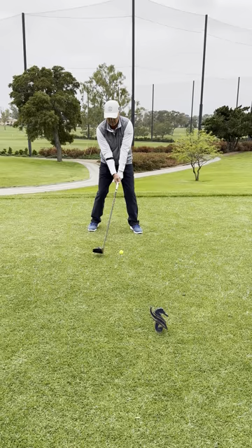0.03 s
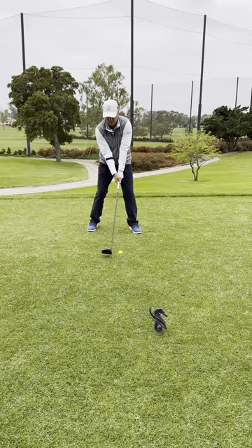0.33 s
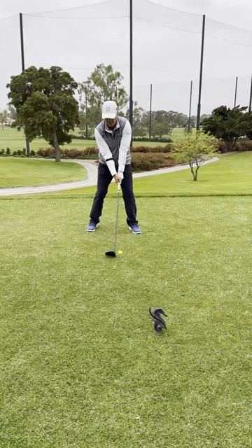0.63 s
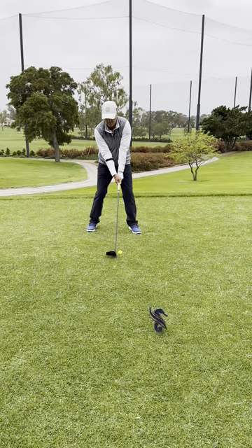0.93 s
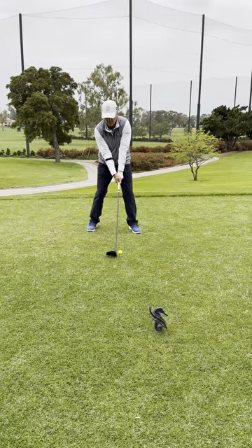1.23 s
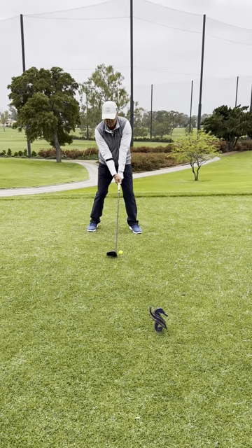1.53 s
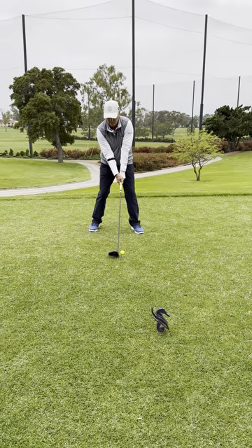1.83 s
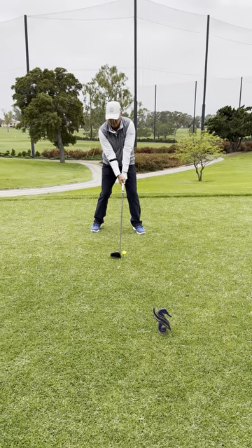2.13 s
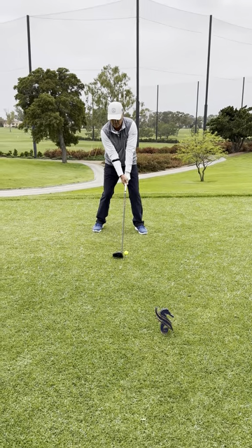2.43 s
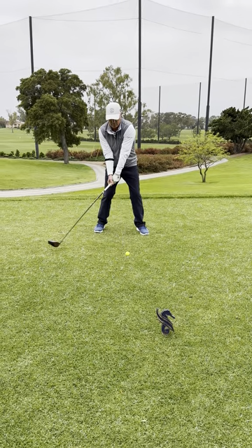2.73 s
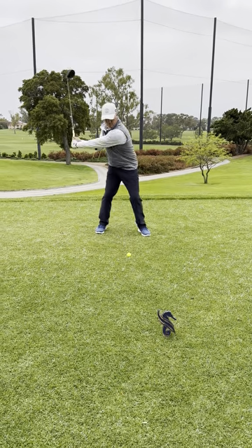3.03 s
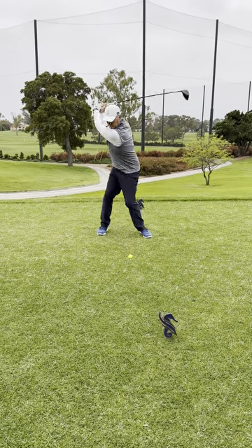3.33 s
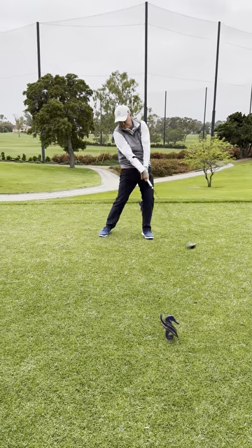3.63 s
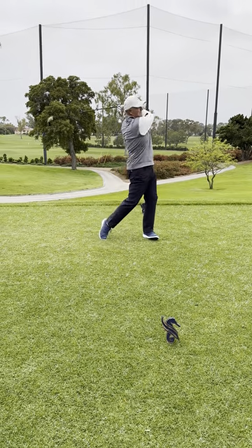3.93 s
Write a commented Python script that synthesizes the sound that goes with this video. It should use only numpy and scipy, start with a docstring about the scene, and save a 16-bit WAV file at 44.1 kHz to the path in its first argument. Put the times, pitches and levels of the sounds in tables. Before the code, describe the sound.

A golf drive is the main sound, coming late on a quiet open range. Faint distant traffic rumbles throughout. A soft songbird gives two high whistles, a buzz around 1 second, five slurred notes, and a trill ending at 2.5. Clothes and grass rustle faintly. The club whooshes from 3.55 and strikes at 3.65 with a loud crack, brief hollow ring and short echo. A light shoe scuff follows.

```python
"""A songbird sings over the low rumble of distant traffic, then a golfer drives a ball on an open range.
The song is gliding tones scattered by trees: two whistles, a buzz, five slurred notes and a trill.
Grass and clothes rustle; vortices and turbulence whoosh behind the club on the downswing.
Ball and face crack, the hollow head rings as it flies on, and the surroundings echo.
Gain control ducks after the crack."""
import sys
import numpy as np
from scipy import signal
from scipy.fft import rfft, irfft
from scipy.io import wavfile

SR = 44100
rng = np.random.default_rng(int(sys.argv[2]) if len(sys.argv) > 2 else 0)


def master_out(mix):
    """Clip the mix to full scale and print it as 16-bit PCM to the path in sys.argv[1]."""
    frames = np.transpose(np.atleast_2d(mix))
    ceiling = np.clip(frames, -1, 1)
    pcm = np.round(ceiling * 32767).astype(np.int16)
    wavfile.write(sys.argv[1], SR, pcm)


N = 176400
T = np.arange(N) / SR
BIN_HZ = np.arange(N // 2 + 1) * SR / N
HIT_S = 3.6505

# direction of the golfer: freq_hz, left_lead_rad
GOLFER_PHASE = [(100,-1),(800,-0.16),(2000,0.5),(4200,.5),(6300,-0.3),(8200,-1.9),(10500,-2.5),(15500,-4)]
# freq_hz, left_minus_right_db
GOLFER_BALANCE = [(300,-0.5),(800,-1),(2000,-1),(4200,.3),(6000,-.4),(9000,.3),(15000,-0.5)]
# left-right likeness of nearby noise: freq_hz, coherence
NEAR_COHERENCE = [(200,0.99),(800,0.63),(1400,0.91),(2500,0.49),(4000,0.33),(6300,0.6),(8500,1)]


def from_db(db):
    """Decibels to gain."""
    return 10 ** (np.asarray(db) / 20)


def unit_rms(x):
    """Scale to rms one."""
    return x / np.sqrt(np.mean(x ** 2) + 1e-20)


def in_time(rows, t=T):
    """Each column of a curve, linearly interpolated at times t."""
    time_s, *columns = np.transpose(rows)
    return [np.interp(t, time_s, column) for column in columns]


def spectrum(points):
    """A curve interpolated onto the FFT bins, in log frequency."""
    freq_hz, value = np.transpose(points)
    return np.interp(np.log(BIN_HZ + 1e-6), np.log(freq_hz), value)


def during(rows, t=T):
    """Gate: one while a curve lasts, 2 ms fades outside it."""
    return np.clip(np.minimum(t - rows[0][0], rows[-1][0] - t) / .002 + 1, 0, 1)


def drift(rate_hz):
    """Smooth random wander, rms one."""
    pole = np.exp(-2 * np.pi * rate_hz / SR)
    return unit_rms(signal.lfilter([1], [1, -2 * pole, pole * pole], rng.standard_normal(N + SR))[SR:])


def phase_of(hz):
    """Running phase of a moving frequency."""
    return 2 * np.pi * np.cumsum(hz) / SR


def resonate(x, hz, width_hz):
    """Resonance with unit peak gain."""
    r = np.exp(-np.pi * width_hz / SR)
    feedback = [1, -2 * r * np.cos(2 * np.pi * hz / SR), r * r]
    return signal.lfilter(np.array([1, 0, -1]) * (1 - r * r) / 2, feedback, x + 1e-18)


def lowpass(x, cut_hz):
    """Second-order low-pass."""
    return signal.sosfilt(signal.butter(2, cut_hz, fs=SR, output="sos"), x + 1e-18)


def delayed(x, delay_s):
    """Fractional delay."""
    return np.interp(T - delay_s, T, x, left=0)


def coloured(x, colour):
    """Filter by rows of freq_hz, gain_db."""
    return irfft(rfft(x) * from_db(spectrum(colour)), N)


def placed(x, phase, balance):
    """Stereo direction from left-right phase and level differences."""
    half = np.array([[.5], [-.5]])
    return irfft(rfft(x) * from_db(half * spectrum(balance)) * np.exp(1j * half * spectrum(phase)), N)


def noise(colour, coherence=NEAR_COHERENCE):
    """Coloured stereo noise, rolled off beyond the table's ends; rms one."""
    mid, side = rfft(rng.standard_normal((2, N)))
    alike = np.clip(spectrum(coherence), 0, 1)
    stereo = np.sqrt(1 + alike) * mid + np.sqrt(1 - alike) * side * [[1], [-1]]
    rolloff = np.minimum(1, np.minimum(BIN_HZ / colour[0][0], colour[-1][0] / (BIN_HZ + 1))) ** 3
    return unit_rms(irfft(rolloff * from_db(spectrum(colour)) * stereo, N))


def engine(hz, width_hz):
    """Unsteady low tone from narrow-band noise, rms one."""
    return unit_rms(lowpass(resonate(rng.standard_normal(N + SR), hz, width_hz), 2 * hz)[SR:])


def distant_traffic():
    """Low rumble, two engine tones and slowly swelling tyre noise."""
    # road noise spectra: freq_hz, density_db
    rumble_colour = [(30,-27),(40,-12),(55,1),(85,-7),(125,-0.5),(175,-11.5),(260,-22.5),(400,-29)]
    tyre_colour = [(150,-0.5),(300,-0.5),(500,2.5),(800,-2),(1200,-5),(2000,-15.5),(3500,-23),(5000,-33.5),(7500,-41.5),(10000,-60.5),(15000,-51)]
    # tyre swell: time_s, gain_db
    tyre_swell = [(0,0),(.4,1.5),(1.0,1),(1.7,-1),(2.1,0.5),(2.55,2.5),(3.1,1),(4,0)]
    # a far engine comes and goes: time_s, level_db
    passing_level = [(0,-71.5),(1.9,-70),(2.3,-59.5),(2.7,-55),(3.1,-55.5),(3.35,-66.5)]
    # left-right likeness: freq_hz, coherence
    road_coherence = [(60,1),(150,1),(300,0.84),(800,0.6),(1400,0.96),(2500,.63),(5000,0.3),(12000,0.22)]
    # direction of the road: freq_hz, left_lead_rad
    road_phase = [(80,-0.23),(250,-0.13),(450,-0.43),(800,-0.4),(1400,0.6),(2500,0.62),(6000,0.46)]
    # freq_hz, left_minus_right_db
    road_balance = [(100,-1.5),(250,0.7),(450,-1.5),(800,-3.5),(1400,-2),(2500,0.5),(6000,2)]
    swell_db, = in_time(tyre_swell)
    passing_db, = in_time(passing_level)
    drone = from_db(-48.5) * engine(hz=69.25, width_hz=6.2)
    passing = from_db(passing_db) * engine(hz=176.4, width_hz=12)
    tyres = from_db(swell_db - 58) * placed(noise(tyre_colour, road_coherence), road_phase, road_balance)
    rumble = from_db(-52.5) * noise(rumble_colour, road_coherence)
    return rumble + drone + passing + tyres


def bird_buzz():
    """A tone warbled wide and fast, loudest in the middle of each sweep."""
    # course of the buzz: time_s, centre_hz, level_db, warble_rate_hz
    contour = [(.78,5710,-77,160),(.805,5750,-63.5,150),(.85,5710,-58.5,150),(.94,5790,-66.5,144),(1.03,5900,-65.5,152),(1.13,6090,-63,146),(1.28,6300,-62.5,141),(1.352,6330,-66.5,146),(1.362,6350,-81,130)]
    depth_hz, rough_hz, focus_hz = 1350, 304, 980
    centre_hz, level_db, rate_hz = in_time(contour)
    warble_hz = depth_hz * np.sin(phase_of(rate_hz * (1 + .025 * drift(40)))) + rough_hz * drift(600)
    widening = (centre_hz / centre_hz[0]) ** 1.3
    tone = np.sin(phase_of(centre_hz + widening * warble_hz))
    focus = np.exp(-.5 * (warble_hz / focus_hz) ** 2)
    return np.sqrt(2) * from_db(level_db + 2.5) * during(contour) * focus * tone


def add_bird_note(song, stroke, waver, start_s=0, gain_db=0, pitch_ratio=1):
    """Add one gliding tone, slightly unsteady in level and pitch."""
    span = slice(int((start_s + stroke[0][0]) * SR) - 100, int((start_s + stroke[-1][0]) * SR) + 100)
    age_s = T[span] - start_s
    pitch_hz, level_db = in_time(stroke, age_s)
    level_waver, pitch_waver = waver[:, span]
    gain = from_db(level_db + gain_db + 1.5 * level_waver) * during(stroke, age_s)
    tone = np.sin(phase_of(pitch_hz * pitch_ratio * (1 + .0082 * pitch_waver)))
    song[span] += np.sqrt(2) * gain * tone


def songbird():
    """Whistles, buzz, slurs and trill, bounced off the ground and scattered by trees."""
    # two whistles; an upward flick after each, over a lower note: time_s, pitch_hz, level_db
    whistles = [
        [(0.145, 6298, -78), (0.157, 6380, -63), (0.181, 6290, -54), (0.215, 6330, -56.5), (0.257, 6420, -70.5),
         (0.265, 6430, -80)],
        [(0.485, 6292, -77), (0.497, 6310, -60), (0.517, 6280, -52), (0.569, 6233, -57.5), (0.585, 6210, -73)],
    ]
    flicks = [
        [(.265,6700,-94),(.278,7450,-69),(.289,8080,-57.5),(.3,8100,-73)],
        [(.594,6600,-89),(.607,7200,-70),(.617,8220,-61),(.625,8640,-84)],
        [(.262,6000,-84),(.28,6160,-69),(.29,6170,-80)],
        [(.582,6100,-78),(.598,5960,-77),(.608,6200,-78)],
    ]
    # slurred notes: start_s, main_stroke_db, side_strokes_db, pitch_ratio
    slurs = [(1.455,1,2,1.023),(1.575,0,0.5,1.04),(1.692,-1,1.5,1.005),(1.817,1.5,0,.99),(1.936,1.5,-5,1.006)]
    # strokes of a slur from both sides of the syrinx, main first: offset_s, pitch_hz, level_db
    slur_strokes = [
        [(0,3300,-62),(.012,3680,-51.5),(.026,3990,-57),(.036,4122,-57),(.044,4050,-59.5),(.06,4070,-73)],
        [(-.014,5900,-76),(-.005,6400,-64.5),(.002,6700,-87)],
        [(-.011,5030,-71.5),(-.004,5220,-64),(.003,5350,-77)],
        [(.04,8200,-89),(.051,6600,-77.5),(.061,5420,-74)],
        [(.03,4100,-66),(.04,3960,-60.5),(.048,3600,-64),(.058,3100,-77)],
    ]
    # pips of the trill: start_s, level_db
    trill = [(2.0248, -71), (2.0458, -63), (2.0732, -61), (2.0937, -56.5), (2.1171, -56.5), (2.1371, -55.5),
             (2.1575, -54.5), (2.1785, -54.5), (2.2004, -55), (2.2219, -54.5), (2.2413, -53),
             (2.2638, -55.5), (2.2827, -53), (2.3047, -57), (2.3246, -55), (2.3461, -55.5), (2.3675, -53.5),
             (2.389, -56), (2.4114, -58), (2.4339, -56), (2.4573, -60), (2.4783, -58)]
    # one falling pip: offset_s, pitch_hz, gain_db
    pip = [(-.005,4020,-17.5),(.003,3548,-1),(0.012,3280,-19)]
    # ground bounce; treble loss in leaves: freq_hz, gain_db
    ground_colour = [(3200,2.5),(4200,2.5),(4550,1.5),(4950,3),(5350,-5),(5700,3),(6400,-1),(7200,-5),(8500,-1.5)]
    leaf_colour = [(3500,-0.5),(4300,-0.5),(5500,-0.5),(6400,-3),(7500,-12),(8500,-17)]
    # direction of the bird: freq_hz, left_lead_rad
    bird_phase = [(3400,2.33),(4200,1.8),(5000,1.4),(6300,-1.04),(8200,-1.7)]
    # freq_hz, left_minus_right_db
    bird_balance = [(3400,7.5),(4200,5),(5500,0),(6300,1),(8200,-0.5)]
    echo_db, echo_t60_s = -8, .69
    song = bird_buzz()
    waver = np.array([drift(60), drift(60)])
    for stroke in list(whistles) + list(flicks):
        add_bird_note(song, stroke, .13 * waver)  # far steadier than the other notes
    for start_s, main_db, side_db, pitch_ratio in slurs:
        for k, stroke in enumerate(slur_strokes):
            add_bird_note(song, stroke, waver, start_s, side_db if k else main_db, pitch_ratio)
    for start_s, level_db in trill:
        add_bird_note(song, pip, waver, start_s, level_db)
    song = coloured(song, ground_colour)
    scatter = unit_rms(rng.standard_normal((2, SR)) * from_db(-60 * T[:SR] / echo_t60_s)) / np.sqrt(SR)
    echo = signal.fftconvolve(coloured(song, leaf_colour)[None], scatter, axes=1)[:, :N]
    return placed(song, bird_phase, bird_balance) + from_db(echo_db) * echo


def ticks():
    """Small ticks of shoes and club: short resonant noise bursts."""
    # bursts: start_s, level_db, centre_hz, width_hz, t60_s
    bursts = [(1.3535,-54.5,1600,1500,.012),(3.0292,-53,4000,3400,.011),(3.1682,-53,1500,1300,.009),(3.5712,-47,3700,4200,.007)]
    rms_span_s = .005
    track = np.zeros(N)
    for start_s, level_db, centre_hz, width_hz, t60_s in bursts:
        decay = (T >= start_s) * from_db(-60 * np.clip((T - start_s) / t60_s, 0, 2))
        burst = rng.choice([-1, 1], N) * decay
        tick = lowpass(resonate(burst, centre_hz, width_hz), 1.37 * centre_hz)
        track += from_db(level_db) * tick * np.sqrt(rms_span_s * SR / np.sum(tick ** 2))
    return track


def rustle():
    """Grainy rustle of grass and clothes, and a shoe scuff in the follow-through."""
    # friction envelopes: time_s, level_db
    rustle_level = [(0,-104),(2.52,-80.5),(2.6,-77.5),(2.67,-68.5),(2.71,-73),(2.74,-87),(3.0,-77),(3.06,-74),(3.15,-77),(3.35,-77),(3.55,-75),(3.85,-68),(3.93,-62),(4,-58.5)]
    scuff_level = [(3.83,-75),(3.86,-59),(3.9,-66),(3.92,-52.5),(3.94,-58),(3.975,-54.5),(4,-62)]
    # friction spectra: freq_hz, density_db
    rustle_colour = [(900,-2),(1700,-4),(2800,-2),(4200,3.5),(6500,-4),(9000,-10),(15000,-36)]
    scuff_colour = [(350,-3.5),(900,4),(2000,-2),(3200,-14),(6000,-6),(10000,-28)]
    rustle_db, = in_time(rustle_level)
    scuff_db, = in_time(scuff_level)
    grain_db = 2.5 * drift(41)
    brushing = from_db(rustle_db + grain_db) * noise(rustle_colour)
    scuff = from_db(scuff_db) * during(scuff_level) * noise(scuff_colour)
    return brushing + scuff


def whoosh():
    """Vortices sing behind the club, pitch following speed; hiss peaks at the bottom of the arc."""
    # downswing: time_s, vortex_hz, level_db
    swing = [(3.545,330,-57),(3.556,382.5,-48.5),(3.572,604,-48.5),(3.587,743,-40),(3.603,774,-36),(3.617,882,-27),(3.633,898,-33.5),(3.648,852,-32),(3.657,630,-52),(3.668,564,-42),(3.70,456,-53.5),(3.72,396,-59)]
    # turbulence: freq_hz, density_db
    hiss_colour = [(140,1),(230,10.5),(550,4.5),(1200,6.5),(1700,-1),(2500,1),(4000,-8),(7000,-7),(10000,-21),(15000,-16)]
    peak_s, peak_db, rise_db_per_s, fall_db_per_s = 3.645, -34, 336, 894
    vortex_hz, level_db = in_time(swing)
    waver_db = 2 * drift(85)
    head = unit_rms(from_db(waver_db) * np.sin(phase_of(vortex_hz * (1 + .022 * drift(92)))))
    shaft_rad = phase_of(.57 * vortex_hz)  # the slower shaft sheds lower, looser vortices
    shaft = unit_rms(drift(226) * np.cos(shaft_rad) + drift(226) * np.sin(shaft_rad))
    vortices = from_db(level_db) * during(swing) * (head + from_db(-5.5) * shaft)
    hiss_db = peak_db - np.maximum(rise_db_per_s * (peak_s - T), fall_db_per_s * (T - peak_s))
    swish = vortices + from_db(hiss_db) * noise(hiss_colour)[0]
    echo = from_db(-19) * lowpass(delayed(swish, delay_s=.125), cut_hz=450)
    return swish + echo


def crack_echoes():
    """Turf, trees and netting return the crack as fading noise."""
    # returns after the hit: delay_s, level_db, rise_s, t60_s
    returns = [(.001,-17,0.00059,0.018),(0.012,-38,.002,0.059),(.042,-42,0.012,0.42),(.088,-41.5,.012,0.2),(0.166,-49.5,.006,0.36)]
    # their spectrum: freq_hz, density_db
    echo_colour = [(200,-3),(600,-6),(1200,-5.5),(2500,-8),(4000,-7),(5300,-4),(6400,3),(8000,-5),(10000,-3),(12500,-25),(15000,-11)]
    power = np.zeros(N)
    for delay_s, level_db, rise_s, t60_s in returns:
        age_s = T - HIT_S - delay_s
        onset = np.clip(1 + age_s / rise_s, 0, 1)
        power += (onset * from_db(level_db - 60 * np.maximum(age_s, 0) / t60_s)) ** 2
    return np.sqrt(power) * noise(echo_colour)


def head_ring():
    """The hollow head rings with a flutter, sinking in pitch as it swings away."""
    # head modes: pitch_hz, level_db, t60_s
    modes = [(2080,-49,0.13),(3600,-39.5,0.13),(3673,-41,0.078),(4230,-37,0.058),(4660,-31.5,0.08),(4803,-32,0.059),(5440,-35.5,0.063),(5900,-29.5,0.061),(6080,-31,0.039),(6460,-25.5,0.037),(6860,-40,.04),(8040,-38,0.074),(8170,-23,0.059),(9030,-34,.05),(10200,-45,.06),(10600,-36,0.064),(15200,-39,.05)]
    # reflections from close by: delay_s, gain_db, cut_hz
    reflections = [(.0115,-1,8500),(.017,0.5,4800)]
    doppler_sag_per_s, build_s = .65, .00046
    age_s = np.maximum(T - HIT_S, 0)
    rad_per_hz = phase_of((age_s > 0) * (1 - doppler_sag_per_s * age_s))
    ring = np.zeros(N)
    for pitch_hz, level_db, t60_s in modes:
        flutter_db = 2 * drift(170)
        envelope = from_db(level_db - 60 * age_s / t60_s + flutter_db)
        ring += envelope * np.sin(pitch_hz * rad_per_hz + rng.uniform(0, 2 * np.pi))
    ring *= 1 - np.exp(-age_s / build_s)
    return ring + sum(from_db(gain_db) * lowpass(delayed(ring, delay_s), cut_hz)
                      for delay_s, gain_db, cut_hz in reflections)


def crack():
    """The blow excites broad resonances of ball and club face."""
    # the blow and its bounces off the turf: delay_s, level_db
    impulses = [(0,-5),(.00062,0.5),(.002,-14)]
    # ball and face: centre_hz, width_hz, gain_db
    resonances = [(1030,580,11.5),(2500,650,15),(3190,590,9),(5960,680,16.5),(8130,410,10.5),(8900,850,9),(11100,1000,6),(15400,980,14)]
    clicks = np.zeros(N)
    for delay_s, level_db in impulses:
        clicks[int((HIT_S + delay_s) * SR)] += from_db(level_db)
    return sum((-1) ** k * from_db(gain_db) * resonate(clicks, centre_hz, width_hz)
               for k, (centre_hz, width_hz, gain_db) in enumerate(resonances))


def scene():
    """The drive, slightly to the right, with bird and traffic around it."""
    golfer = whoosh() + crack() + head_ring() + crack_echoes() + ticks() + rustle()
    return placed(golfer, GOLFER_PHASE, GOLFER_BALANCE) + songbird() + distant_traffic()


def record(dry):
    """Brief opening silence; gain control ducks after the crack; soft clip and treble cut."""
    open_s, ceiling, cutoff_hz = .036, .76, 16400
    threshold_db, duck_share, attack_s, release_db_per_s = -15, .37, .067, 29
    over_db = np.maximum(20 * np.log10(np.abs(dry).max(axis=0) + 1e-9) - threshold_db, 0)
    held_db = np.maximum.accumulate(over_db + release_db_per_s * T) - release_db_per_s * T
    pole = np.exp(-1 / (attack_s * SR))
    duck_db = duck_share * signal.lfilter([1 - pole], [1, -pole], held_db)
    gain = from_db(-duck_db) * (T >= open_s)
    rounded = ceiling * np.tanh(dry * gain / ceiling)
    return signal.sosfilt(signal.ellip(10, .1, 80, cutoff_hz, fs=SR, output="sos"), rounded)


dry = scene()
out = record(dry)
master_out(out)
```